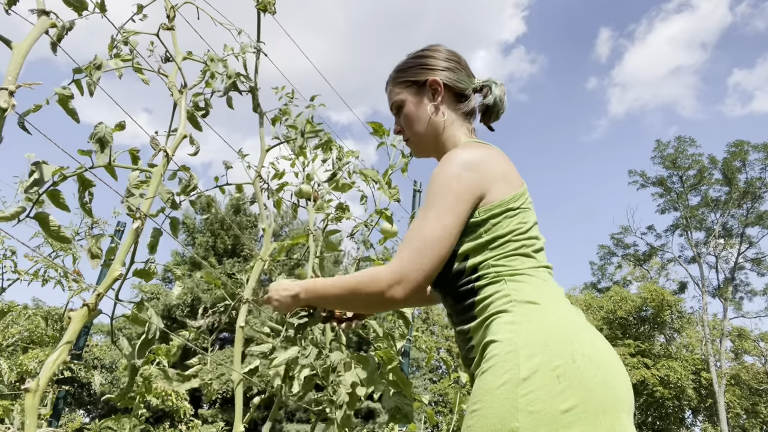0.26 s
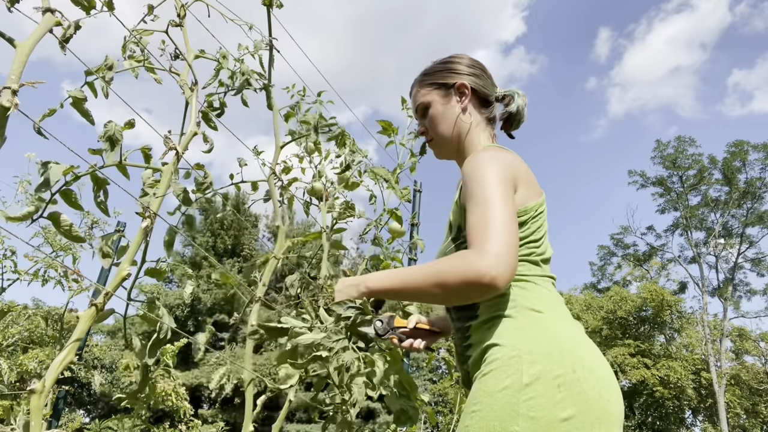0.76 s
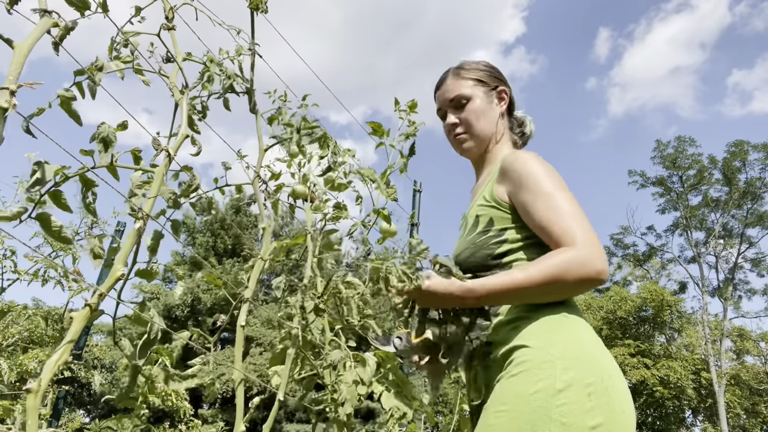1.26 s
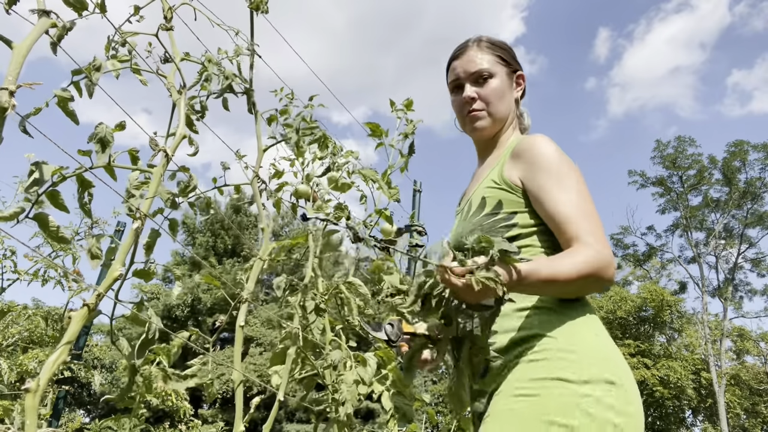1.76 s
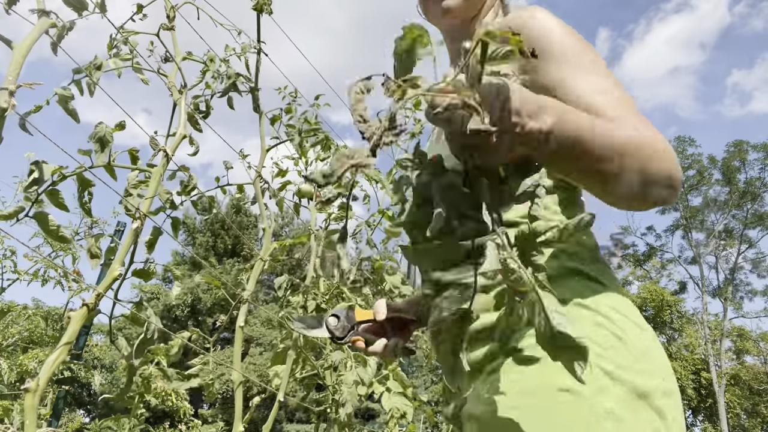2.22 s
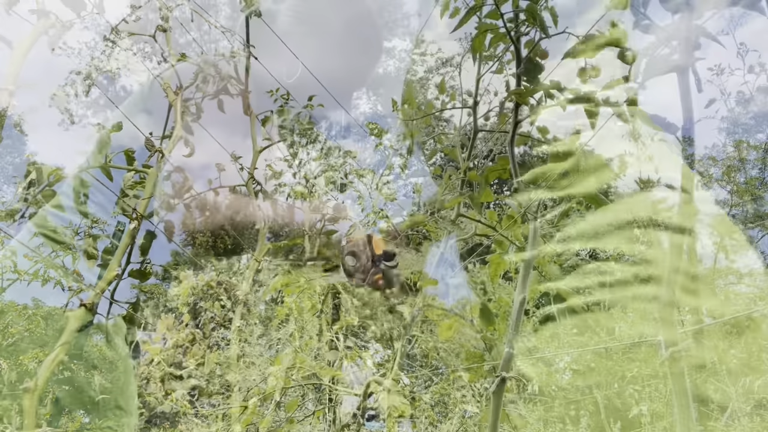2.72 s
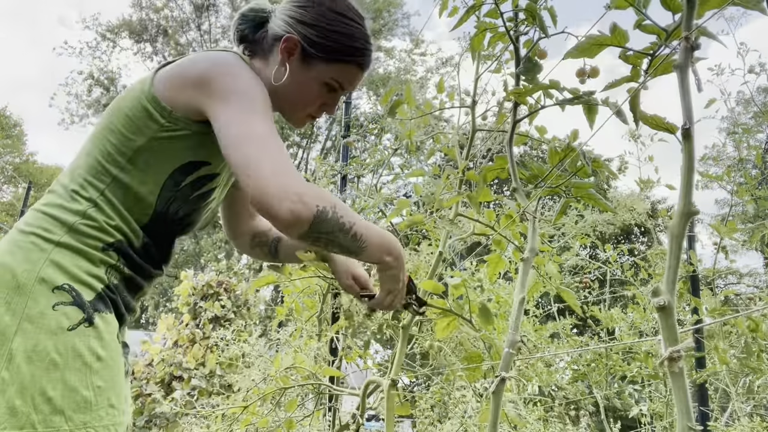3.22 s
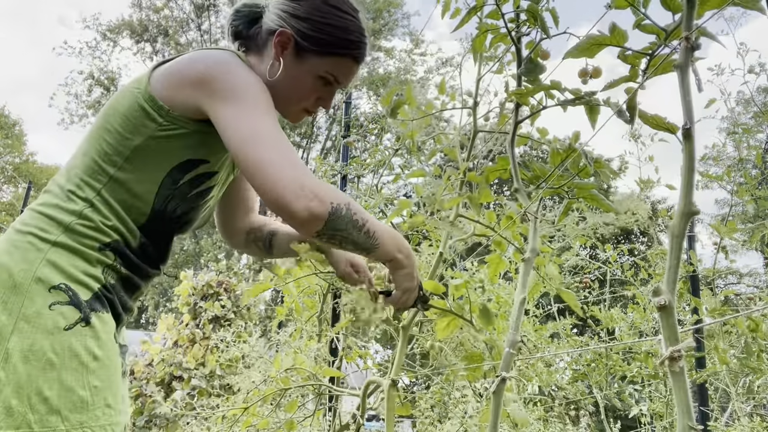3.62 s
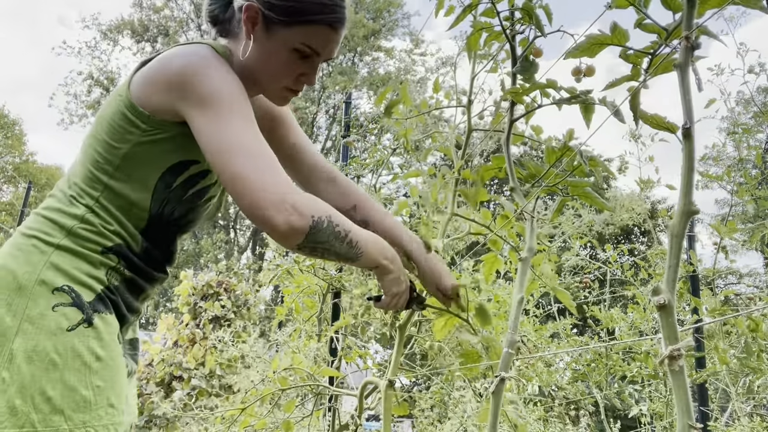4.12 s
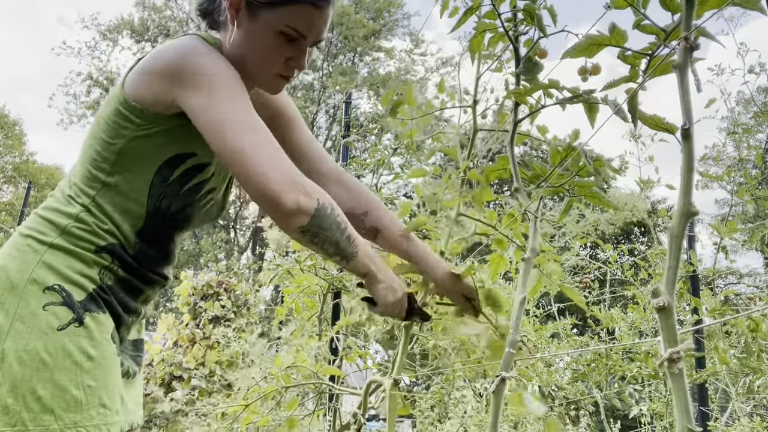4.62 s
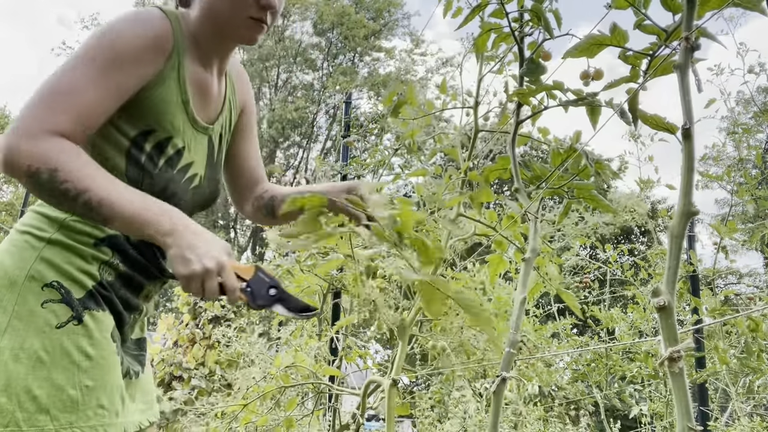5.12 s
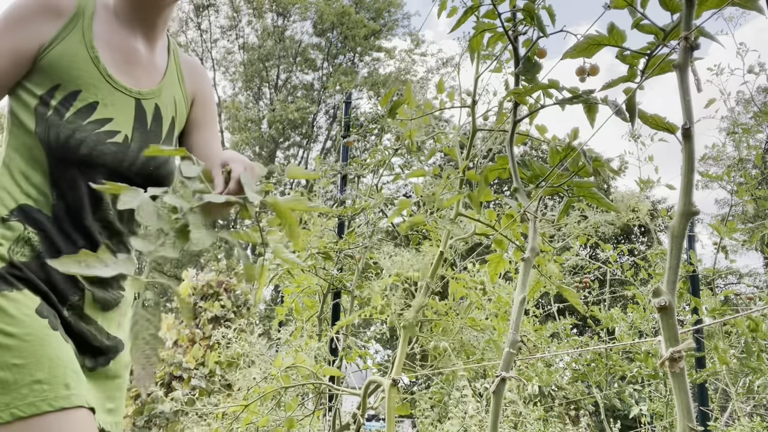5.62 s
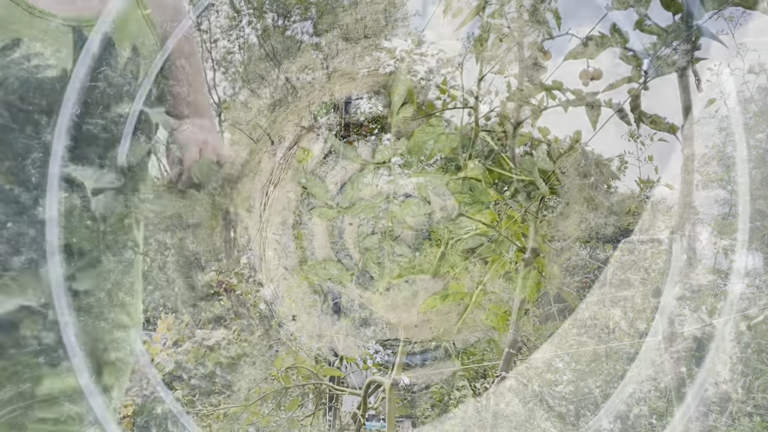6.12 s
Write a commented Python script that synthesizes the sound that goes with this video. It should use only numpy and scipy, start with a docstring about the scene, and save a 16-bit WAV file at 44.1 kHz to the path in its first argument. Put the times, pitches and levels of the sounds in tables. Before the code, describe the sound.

Outdoors in a garden, close stereo microphones catch a crisp burst of leaf rustling and crackling. After a quieter moment, a dull footstep crushes soft ground and dry litter, then shears tick lightly. Cicadas rise into a shimmering buzz, another softer step lands, and the shears crack sharply through a stem with a short metallic clack. Low distant rumble and airy noise continue as the cicadas ebb.

```python
"""Pruning tall plants in a summer garden

Close to the microphones, leaves rustle in the hand, feet shift on soft ground, and shears tick once and later
snap through a stem. Foliage, soles and stem are grains of friction; metal and ground are struck modes.
Far off lie a rumble and a hum of wavering tones, under open air that crossfades between three spots.
Cicadas swell and ebb: choruses of filtered noise with narrow fuzzy tones among them, and a few lone calls."""
import sys
import numpy as np
from scipy import signal
from scipy.fft import rfft, irfft, next_fast_len
from scipy.io import wavfile
from scipy.ndimage import uniform_filter1d, map_coordinates

SR = 44100
rng = np.random.default_rng(int(sys.argv[2]) if len(sys.argv) > 2 else 0)


def put_to_file(sound):
    """Save the sound as 16-bit audio at rate SR, in the file named by the first command-line argument."""
    columns = np.atleast_2d(sound).T  # one column per channel
    safe = np.clip(columns, -1, 1)
    whole_steps = np.round(safe * 32767)
    wavfile.write(sys.argv[1], SR, whole_steps.astype(np.int16))


N = 280917
TIME = np.arange(N) / SR
SIZE = next_fast_len(N)
HZ = np.fft.rfftfreq(SIZE, 1 / SR)

# swell of the near cicadas: [rise_s, hold_s, level_db, ebb_db_per_s]
NEAR_SWELL = (0.71, 1.69, -50.5, 11)
# steps on soft ground: [time_s, level_db, pitch_factor, tilt_db_per_octave, crush_db against the step]
STEPS = [(1.9388, -36.5, 0.954, 2, -7), (2.972, -38.5, 0.8, -40, -26)]


def amp(db):
    """Decibels to gain."""
    return 10 ** (np.asarray(db) / 20)


def unit(x):
    """Scales a sound or a gain to rms 1."""
    return x / np.sqrt(np.mean(x ** 2) + 1e-20)


def read(points):
    """A table over frequency, joined on a log axis."""
    rows = np.array(points, float)
    return np.interp(np.log(HZ + 1), np.log(rows[:, 0]), rows[:, 1])


def band(points):
    """Gain of a spectrum that falls away steeply beyond its ends."""
    low_end = 1 + (points[0][0] / (HZ + 1)) ** 8
    high_end = (1 + (HZ / points[-1][0]) ** 16) ** .5
    return amp(read(points)) / low_end / high_end


def colour(x, gain):
    """Filters x by a gain over frequency."""
    return irfft(rfft(x, SIZE) * gain, SIZE)[..., :N]


def causal(gain):
    """The same gain with minimum phase, as a real body has: it never rings before it is struck."""
    cepstrum = irfft(np.log(gain + 1e-5), SIZE)
    fold = 1 + np.sign(SIZE / 2 - np.arange(SIZE))
    fold[0] = 1
    return np.exp(rfft(cepstrum * fold))


def noise():
    """White noise, unrelated left and right."""
    return rng.standard_normal((2, N))


def drift(rate_hz):
    """Slow chance of rms 1."""
    return unit(colour(rng.standard_normal(N), np.exp(-(HZ / rate_hz) ** 2)))


def stroke(strokes, lean):
    """Force that grows to each peak and dies away; lean tips its level by the brightness of the stroke."""
    power = np.zeros(N)
    for s, db, rise_s, decay_s, bright_db in strokes:
        near = slice(max(0, int((s - 8 * rise_s) * SR)), int((s + 8 * decay_s) * SR))
        away = np.maximum((s - TIME[near]) / rise_s, (TIME[near] - s) / decay_s)
        power[near] += (amp(db + lean * bright_db) * np.exp(-away)) ** 2
    return np.sqrt(power)


def gestures(rows, rising):
    """Strokes that spend the same share of their length growing."""
    return [(s, db, rising * length_s, (1 - rising) * length_s, bright_db)
            for s, db, length_s, bright_db in rows]


def ring(s, hz, t60_s):
    """One mode struck at time s: a sine that dies away exponentially."""
    age = np.arange(SR // 4) / SR
    out = np.zeros(N)
    out[round(s * SR):][:len(age)] = np.sin(2 * np.pi * hz * age) * np.exp(-np.log(1000) * age / t60_s)
    return out


def friction(strokes, spectrum, middle_hz, grains_per_s, spread_db, smooth, clumps=1):
    """Tiny slips of uneven size over a sliding hiss; each stroke leans to the bands below or above the middle."""
    slips = rng.random(N) < grains_per_s / SR
    sizes = amp(spread_db * np.minimum(rng.exponential(1, N), 3)) * slips
    slip_noise = unit(sizes * rng.choice([-1, 1], (2, N)))
    grains = unit(clumps * (slip_noise + smooth * noise()))
    low_end = 1 + (spectrum[0][0] / (HZ + 1)) ** 4
    body = causal(unit(amp(read(spectrum)) / low_end))
    upper = 1 / (1 + (middle_hz / (HZ + 1)) ** 4)
    return sum(colour(grains * stroke(strokes, lean), body * share)
               for share, lean in [(1 - upper, -.5), (upper, .5)])


def whistle(hz, width_hz):
    """A fuzzy tone that follows the pitch curve hz: narrow noise moved up to that pitch."""
    pole = np.exp(-np.pi * width_hz / SR)
    fuzz = unit(signal.lfilter([1], [1, -pole], noise()[:, :len(hz)]))
    song = (fuzz[0] + 1j * fuzz[1]) * np.exp(2j * np.pi * np.cumsum(hz) / SR)
    return np.array([song.real, song.imag])


def open_air(waver_db=0.86):
    """Wavering noise whose colour crossfades between three spots of the garden."""
    # air at each spot: [pitch_hz, level_db per Hz]
    air_first = [(150, -105), (330, -84), (600, -86.5), (950, -87.5), (1300, -100), (1750, -98),
                 (2200, -106.7), (4500, -102.0), (6200, -106), (7100, -99.5), (7500, -102), (8150, -95),
                 (8900, -101.5), (11500, -108.8), (14800, -103.7)]
    air_second = [(150, -105), (330, -86.5), (600, -90.5), (1180, -88), (1450, -102), (1800, -98),
                  (2250, -106), (8000, -105), (11800, -103.5), (14800, -103.5)]
    air_third = [(150, -105), (280, -77.5), (550, -92.5), (950, -82), (1400, -97), (1900, -103.9),
                 (2600, -110.2), (4400, -105.9), (8000, -104.1), (10500, -119.4), (14800, -112.3)]
    # crossfades from one spot to the next: [start_s, end_s]
    crossfades = [(2.3, 2.58), (5.95, 6.34)]
    second, third = (np.clip((TIME - a) / (b - a), 0, 1) for a, b in crossfades)
    spots = [(air_first, 1 - second), (air_second, second * (1 - third) ** 2), (air_third, third ** 2)]
    air = sum(colour(noise(), amp(read(spectrum))) * np.sqrt(share * SR / 2) for spectrum, share in spots)
    return air * amp(waver_db * drift(18.0))


def distant_rumble(level_db=-50.5, waver_db=0.5):
    """Low noise at a wavering level, which swells at each step."""
    # rumble: [pitch_hz, level_db]
    rumble_spectrum = [(20, -52), (31, -23), (42, -9.5), (56, -3.5), (75, -0.5), (92, 0), (118, 1.5),
                       (135, -5), (165, -9), (240, -12), (400, -30.5), (800, -75)]
    # swell at a step: [level_db against the step, rise_s, decay_s, brightness_db (not heard here)]
    boom_db, rise_s, decay_s = (-10, .04, .12, 0)[:3]
    booms = [(s, step_db + boom_db, rise_s, decay_s, 0) for s, step_db, *_ in STEPS]
    level = np.hypot(amp(level_db + waver_db * drift(5.9)), stroke(booms, 0))
    return unit(colour(noise(), amp(read(rumble_spectrum)))) * level


def distant_hum(wander=0.0119):
    """A far machine: sines whose pitches each wander by a small share."""
    # hum: [pitch_hz, level_db rms]
    hum_tones = [(102.4, -57), (59.2, -62.5), (120.6, -63.5), (239, -79.5)]
    return sum(amp(db) * np.sqrt(2) * np.sin(2 * np.pi * np.cumsum(hz * (1 + wander * drift(3.04))) / SR)
               for hz, db in hum_tones)


def swell(rise_s, hold_s, db, ebb_db_per_s):
    """Gain of a chorus: it swells, holds, ebbs slowly and fades out."""
    start_s, end_s, fade_s = 2.17, 6.15, .24
    age = TIME - start_s
    ebb_db = ebb_db_per_s * np.maximum(age - rise_s - hold_s, 0)
    return amp(db - ebb_db) * np.clip(age / rise_s, 0, 1) * np.clip((end_s - TIME) / fade_s, 0, 1)


def cicadas(throb_db=1.33, patchy_db=3.0):
    """Many tymbals blur into two throbbing choruses of filtered noise with a fine random ripple over pitch."""
    # far and near choruses: [pitch_hz, level_db]
    far_song = [(2450, -57), (2950, -1.5), (3300, -11), (4200, 3), (4700, 1), (5800, 3), (7000, -0.5),
                (9200, -9.5), (12000, -32)]
    near_song = [(5500, -3), (6400, 9), (7000, 8.5), (7650, 5), (8300, 1.5), (9200, -3), (10100, -4.5),
                 (10800, -27), (12500, -71)]
    # swell of the far chorus: [rise_s, hold_s, level_db, ebb_db_per_s]
    far_swell = (0.99, 1.1, -51, 2.5)
    spacing_hz, ripple_db = 20, 2.2
    pitches = np.arange(0, SR / 2, spacing_hz)
    ripple = amp(ripple_db * np.interp(HZ, pitches, rng.standard_normal(len(pitches))))
    choruses = sum(unit(colour(noise(), band(song) * ripple)) * swell(*shape) * amp(throb_db * drift(20))
                   for song, shape in [(far_song, far_swell), (near_song, NEAR_SWELL)])
    # random patches of pitch and time grow louder and softer
    spectra = signal.stft(choruses, nperseg=2048)[2]
    patches = uniform_filter1d(rng.standard_normal(spectra.shape[1:]), size=2, axis=0)
    patches = unit(uniform_filter1d(patches, size=24, axis=1))
    return signal.istft(spectra * amp(patchy_db * patches))[1][:, :N]


def narrow_tones():
    """Narrow fuzzy tones at fixed pitches colour the near chorus, each wavering in level."""
    # narrow tones: [pitch_hz, level_db against the chorus]
    fixed_pitches = [(4203, -13.5), (6184, -23), (6320, -11.5), (6594, -21), (6827, -12), (7130, -20),
                     (7223, -21), (7315, -23), (7571, -8), (7768, -18), (9077, -17), (9189, -25)]
    width_hz, waver_hz, waver_db = 16, 4, 4
    out = sum(amp(db) * whistle(np.full(N, hz), width_hz) * unit(amp(waver_db * np.tanh(drift(waver_hz))))
              for hz, db in fixed_pitches)
    return out * swell(*NEAR_SWELL)


def pulsing_tones(count=9):
    """Narrow fuzzy tones pulse at random within the chorus, each wandering around its own pitch."""
    low_hz, high_hz, width_hz, wander_hz = 6450, 9200, 19, 69.9
    pulse_hz, pulse_db = 14, 6
    tilt_db_per_octave, level_db = -4.5, -7  # level of all these tones against the chorus
    out = np.zeros((2, N))
    for hz in np.geomspace(low_hz, high_hz, count):
        pulses = unit(amp(pulse_db * np.tanh(drift(pulse_hz))))
        song = whistle(hz + wander_hz * drift(1), width_hz)
        out += amp(tilt_db_per_octave * np.log2(hz / low_hz)) * pulses * song
    return amp(level_db) * unit(out) * swell(*NEAR_SWELL)


def soloists():
    """A few lone insect calls swell quickly and fade slowly while their pitches glide and settle."""
    # lone calls: [start_s, end_s, first_hz, last_hz, width_hz, level_db]
    calls = [(3.949, 5.4, 6950, 6280, 85, -52), (4.097, 5.0, 7820, 7600, 80, -58),
             (5.775, 5.967, 6540, 6570, 60, -54)]
    rise_share, curve = 0.25, 0.56  # a curve under 1 rounds the swell
    out = np.zeros((2, N))
    for start_s, end_s, first_hz, last_hz, width_hz, db in calls:
        span = (TIME > start_s) & (TIME < end_s)
        along = np.linspace(0, 1, span.sum())
        effort = np.interp(along, [0, rise_share, 1], [0, 1, 0]) ** curve
        pitch_hz = last_hz + (first_hz - last_hz) * (1 - along) ** 2
        out[:, span] += amp(db) * effort * whistle(pitch_hz, width_hz)
    return out


def scuffs(clump_db=2.5, clump_hz=90):
    """Clothes catch and drag on the plants as the body shifts; each sole crushes the ground."""
    # soles and clothes dragging: [pitch_hz, level_db]
    scuff_spectrum = [(150, -6.5), (400, -3), (650, -7.5), (900, -6.5), (1250, -5), (1750, -10.5),
                      (2200, -17.5), (2950, -16), (3700, -20), (4600, -11.5), (5900, -15), (8000, -19),
                      (12000, -29.5)]
    # shifts of the body among the plants: [time_s, level_db, length_s, brightness_db]
    shifts = [(1.295, -64.5, 0.085, 22), (1.917, -50, 0.04, -8), (1.955, -63, 0.015, -9),
              (1.985, -53, 0.053, -5), (2.045, -48.5, 0.05, -7), (2.08, -51.5, 0.21, -2.5),
              (2.927, -51, 0.015, -2), (2.955, -51, 0.033, 3), (3.46, -55, 0.033, -9),
              (4.28, -54.5, 0.079, 4), (4.9, -60, 0.077, 14), (6.0, -60, 0.24, 21)]
    late_s, rise_s, decay_s, bright_db = .004, .0025, .022, -12
    crushes = [(s + late_s, db + crush_db, rise_s, decay_s, bright_db + tilt)
               for s, db, _, tilt, crush_db in STEPS]
    return friction(gestures(shifts, rising=0.5) + crushes, scuff_spectrum, middle_hz=1350,
                    grains_per_s=1200, spread_db=2.0, smooth=1.0, clumps=amp(clump_db * drift(clump_hz)))


def steps():
    """The heel rings the modes of the ground in a short thud, then the ball of the foot lands more lightly."""
    # modes of soft ground: [pitch_hz (before the pitch factor), level_db, t60_s]
    ground = [(151, -5, 0.09), (330, -16, 0.05), (490, 2, 0.05), (670, -4, 0.045), (915, -2, 0.06),
              (1730, -11, 0.08)]
    ball_late_s, ball_db, ball_pitch = 0.00822, -11, 0.835  # against the heel
    heels = [row[:4] for row in STEPS]
    balls = [(s + ball_late_s, db + ball_db, pitch * ball_pitch, tilt) for s, db, pitch, tilt in heels]
    # the tilt acts above 600 Hz: softer ground rings less in its upper modes
    thud = sum(amp(db + mode_db + tilt * max(np.log2(hz / 600), 0)) * ring(s, hz * pitch, t60_s)
               for s, db, pitch, tilt in heels + balls for hz, mode_db, t60_s in ground)
    return np.array([thud, thud])


def litter():
    """Dry leaves on the ground slide under the sole and break with thin ticks of noise."""
    # dry litter: [pitch_hz, level_db]
    litter_spectrum = [(1000, -37), (3700, -32), (4500, 0), (5400, -4), (6300, -15), (12000, -32)]
    # slides and ticks underfoot: [time_s, level_db, rise_s, decay_s]
    stirs = [(1.92, -53.5, 0.026, .015), (1.9385, -43, .0005, 0.0014), (2.018, -46.5, .0005, 0.0013),
             (2.149, -52, .0005, .0015)]
    rustle = unit(colour(noise(), causal(amp(read(litter_spectrum)))))
    return rustle * stroke([(*row, 0) for row in stirs], 0)


def flecked(x, fleck_db=3.5, fleck_hz=1100, fleck_s=.003):
    """Every catch flexes another patch of leaf: each instant of a rustle gets its own chance colour."""
    hz, s, spectra = signal.stft(x, SR, nperseg=128)
    cells = np.array(np.meshgrid(hz / fleck_hz, s / fleck_s, indexing="ij"))
    chance = rng.standard_normal(cells.max((1, 2)).astype(int) + 2)
    flecks = unit(map_coordinates(chance, cells, order=1))
    return signal.istft(spectra * unit(amp(fleck_db * flecks)))[1][:, :N]


def leaves():
    """Foliage slides through the hand in uneven catches, stiff edges crackle, and single leaves buckle with a snap."""
    # leaves: [pitch_hz, level_db]
    leaf_spectrum = [(300, -17.5), (650, -11.5), (950, -3.5), (1450, -8), (2000, -14.5), (2350, -19),
                     (3100, -0.5), (4200, -10), (4800, 0.5), (5700, -0.5), (6600, 3), (9400, 2),
                     (11500, .5), (14800, 2)]
    # drags of the hand through foliage: [time_s, level_db, length_s, brightness_db]
    brushes = [(.06, -52.5, 0.086, -3), (.155, -47, 0.027, -14), (.275, -42.5, 0.088, -9),
               (.32, -39, 0.074, -0.5), (.551, -32.5, 0.018, -6.5), (.587, -28.5, 0.034, -2),
               (.635, -43.5, 0.079, -4), (2.1, -59, 0.023, -31)]
    # single leaves buckling: [time_s, level_db, brightness_db]
    crinkles = [(.071, -48, 0), (.181, -36, -6), (.196, -39, 2), (0.1995, -37.5, 2), (.243, -33.5, 2),
                (0.2454, -33, 4), (.298, -47, 3), (.319, -40, 7), (.359, -37, 3), (0.411, -46, 1),
                (0.417, -37.5, 7), (.421, -42, 4), (0.426, -41.5, -3), (.526, -37, 0), (.5295, -50, -3),
                (.553, -43, 0), (0.573, -32, 1), (.581, -37, 0), (.591, -30, -1), (0.619, -44, 3),
                (.661, -34.5, 5), (0.6823, -37, -5), (.913, -55, 15), (.954, -56, 10), (1.337, -53, 14),
                (3.452, -42, -16), (4.274, -38, -6), (4.835, -45, -22), (4.906, -45, -21)]
    snap_db, snap_s = 1, .0004  # dry snap that opens each buckle, level against the buckle
    crackle_db = -5  # against the drag
    drags = gestures(brushes, rising=0.6)
    buckles = [(s, db, 0.0005, 0.0045, bright_db) for s, db, bright_db in crinkles]
    snaps = [(s, db + snap_db, snap_s / 2, snap_s, bright_db) for s, db, bright_db in crinkles]
    slide = friction(drags + buckles + snaps, leaf_spectrum, middle_hz=5450,
                     grains_per_s=2600, spread_db=1.0, smooth=1.0)
    crackle = friction(drags, leaf_spectrum, middle_hz=5700, grains_per_s=260, spread_db=2, smooth=0)
    return flecked(slide + amp(crackle_db) * crackle)


def cracks():
    """Blade and stem crack in sharp bursts of grains, once alone and then in a dense run; splinters trail each."""
    # cracking fibres: [pitch_hz, level_db]
    crack_spectrum = [(250, -22), (550, -2), (1700, -2.5), (2250, -13), (3000, -4), (4100, -7), (6000, 0),
                      (8200, 0.5), (10000, -3.5), (12000, -7), (14500, -8)]
    # cracks of blade or stem: [time_s, level_db, decay_s, brightness_db]
    snips = [(2.4164, -43, 0.0008, 16), (4.3495, -34, .0012, 10), (4.3515, -32, .002, -8),
             (4.3538, -35, .0009, 12), (4.355, -32, .0007, 12), (4.3564, -27, 0.0011, 9),
             (4.3584, -33, 0.0015, -2), (4.3604, -36, .0009, 10)]
    rise_s, splinter_db, splinter_decay_s = 0.00018, -24.5, 0.017  # splinter level against its crack
    breaks = [(s, db, rise_s, decay_s, bright_db) for s, db, decay_s, bright_db in snips]
    splinters = [(s, db + splinter_db, rise_s, splinter_decay_s, bright_db) for s, db, _, bright_db in snips]
    return friction(breaks + splinters, crack_spectrum, middle_hz=2160,
                    grains_per_s=7000, spread_db=1.2, smooth=0.44)


def strike(modes, s, blow_db, build_up_s):
    """One part of the shears rings briefly, damped by the hand; each mode leans to one side."""
    rise = 1 - np.exp(-np.maximum(TIME - s, 0) / build_up_s)
    sides = [sum(amp(blow_db + db + lean * side_db) * ring(s, hz, t60_s) for hz, db, t60_s, side_db in modes)
             for lean in (.5, -.5)]
    return rise * np.array(sides)


def shears():
    """The catch ticks; later the jaws clack shut and the handles meet just after, each ringing its own modes."""
    # modes of catch, blades and handles: [pitch_hz, level_db, t60_s, left_over_right_db]
    catch = [(3550, -4, .009, 0), (4000, -1, .008, 0), (4400, -2, .008, 0), (8850, -2, .007, 0),
             (9700, -5, .006, 0), (11300, -1, .006, 0)]
    blades = [(2850, -3, .018, -14), (3010, -0.5, .026, 8), (3480, -6, .025, 0), (3650, -13, .025, -2),
              (4500, -7.5, .032, 9), (4690, -10, .028, 6), (5130, -16, .028, 3), (5290, -15, .035, 0),
              (5480, -16, .03, -10), (5900, -15, .024, 4), (6600, -16, .03, 2), (6810, -15, .04, -9),
              (7570, -17, .035, 0), (8120, -16, .03, 0)]
    handles = [(600, -4, .024, 0), (800, 0, .026, 0), (1130, -1, .024, 2), (1400, -2, .022, 0),
               (1560, -1, .025, 0), (1930, 1, .028, 6)]
    # tick of the catch: [time_s, level_db]
    catch_tick = (2.4161, -35)
    tick = strike(catch, *catch_tick, build_up_s=.0003)
    jaws_shut = strike(blades, s=4.3547, blow_db=-18, build_up_s=.00075)
    handles_meet = strike(handles, s=4.357, blow_db=-30.5, build_up_s=.001)
    return tick + jaws_shut + handles_meet


def ports(pair):
    """Two close microphone ports hear partly the same sound, shifted in phase."""
    # phase: [pitch_hz, left_lead_rad]
    port_phase = [(200, 0), (950, -1.1), (2200, -6.4), (3500, -7), (6000, -2.6), (7200, -.9), (9100, .2),
                  (11700, 3.1), (13000, 3.5), (14800, 6.2)]
    # likeness of the two ports: [pitch_hz, likeness 0-1]
    port_likeness = [(90, .97), (500, .5), (1700, .55), (2500, .2), (3000, .65), (3600, .15), (6500, .45),
                     (8400, .97), (10500, .75), (14800, .92)]
    a, b = rfft(pair, SIZE)
    same = np.clip(read(port_likeness), 0, 1)
    right = (same * a + np.sqrt(1 - same ** 2) * b) * np.exp(-1j * read(port_phase))
    return irfft(np.array([a, right]), SIZE)[:, :N]


def scene():
    """The garden with the work close by; the shears carry their own left-right lean."""
    background = open_air() + distant_rumble() + distant_hum()
    chorus = cicadas() + narrow_tones() + pulsing_tones() + soloists()
    work = leaves() + scuffs() + steps() + litter() + cracks()
    return ports(background + chorus + work) + shears()


def record(dry, balance_db=0.6, edge_hz=15850):
    """The right port is a little louder in the bass; then the band limit."""
    tilt = amp(np.array([[-.5], [.5]]) * balance_db / (1 + (HZ / 700) ** 2))
    low_pass = signal.firwin(511, edge_hz, window=("kaiser", 9), fs=SR)
    return signal.oaconvolve(colour(dry, tilt), low_pass[None], "same")


dry = scene()
out = record(dry)
put_to_file(out)
```